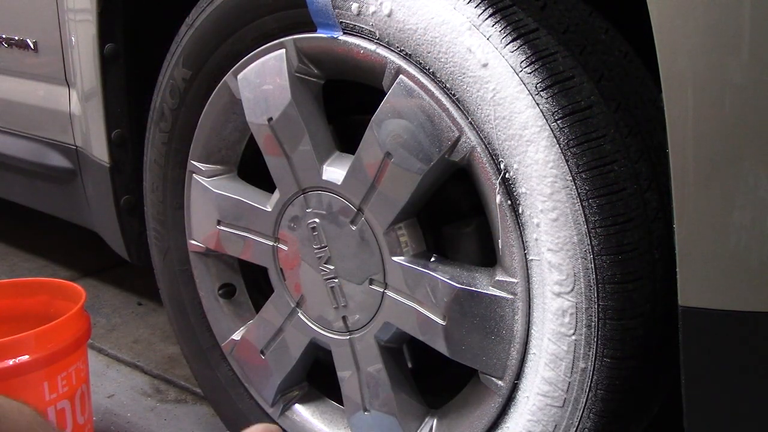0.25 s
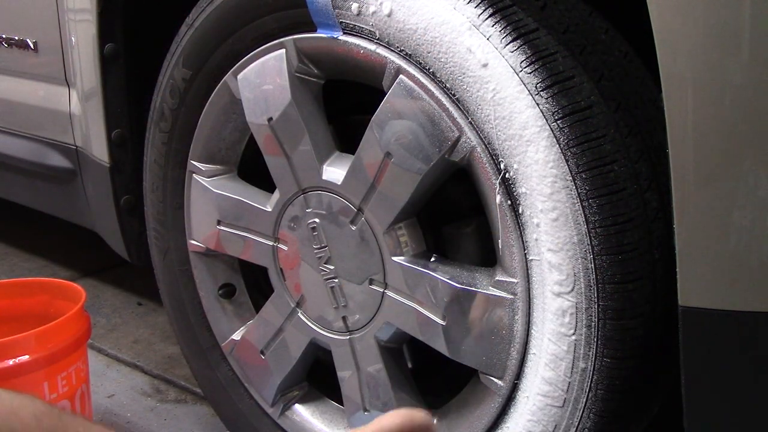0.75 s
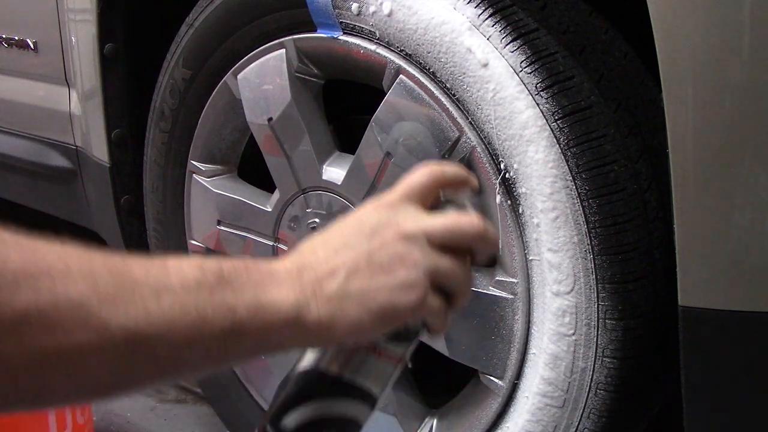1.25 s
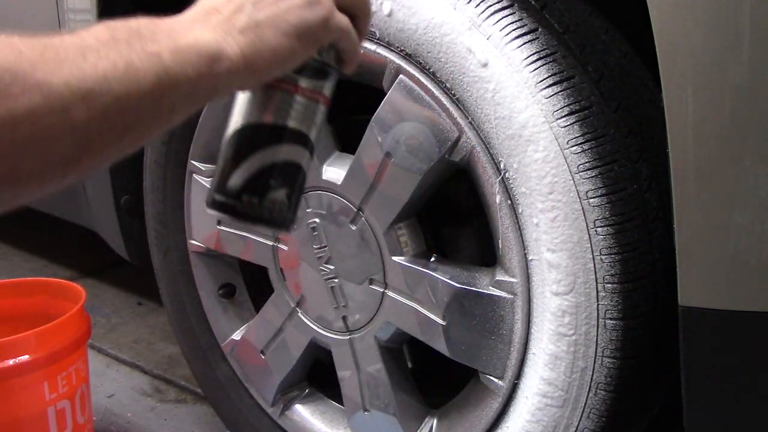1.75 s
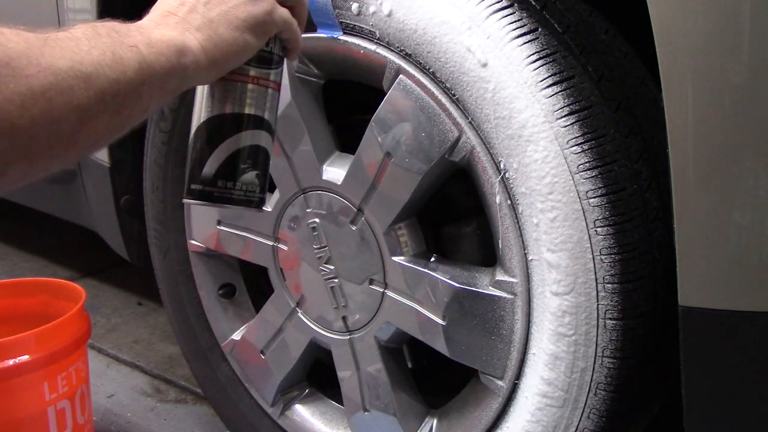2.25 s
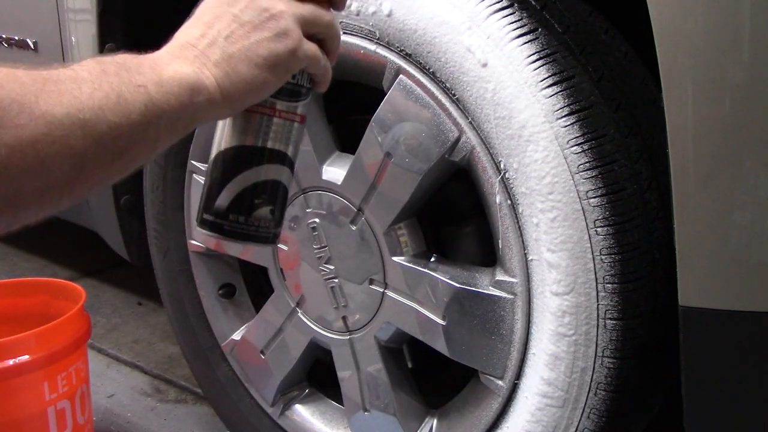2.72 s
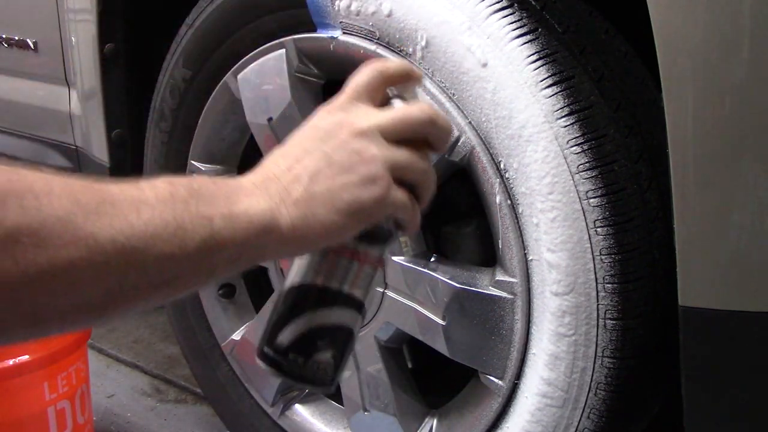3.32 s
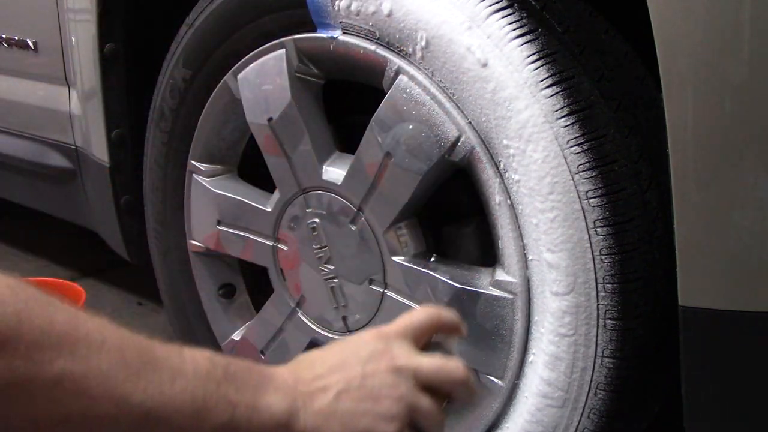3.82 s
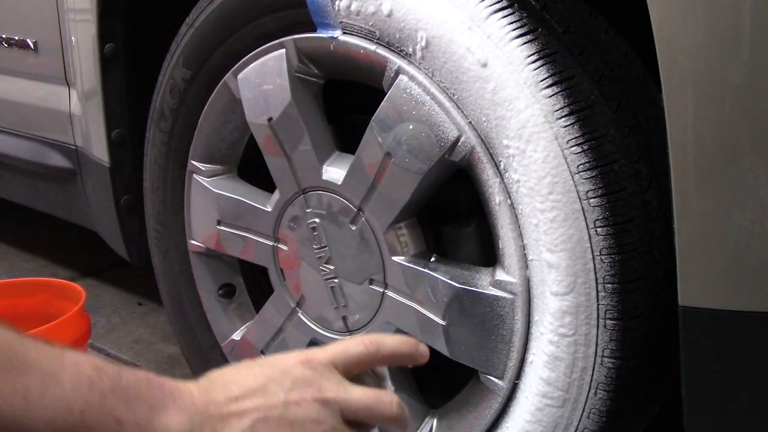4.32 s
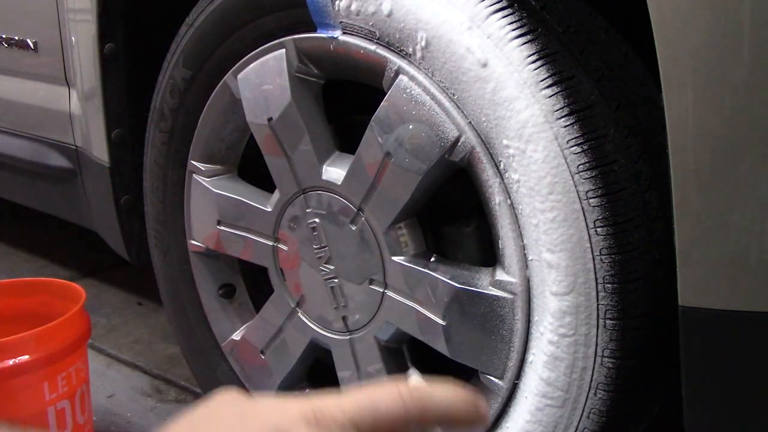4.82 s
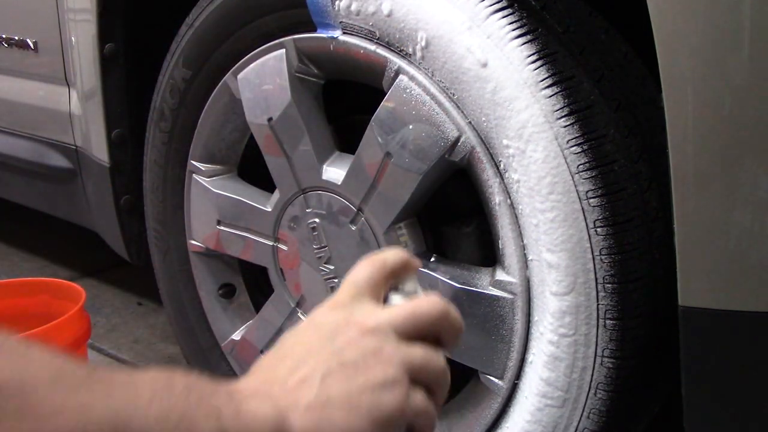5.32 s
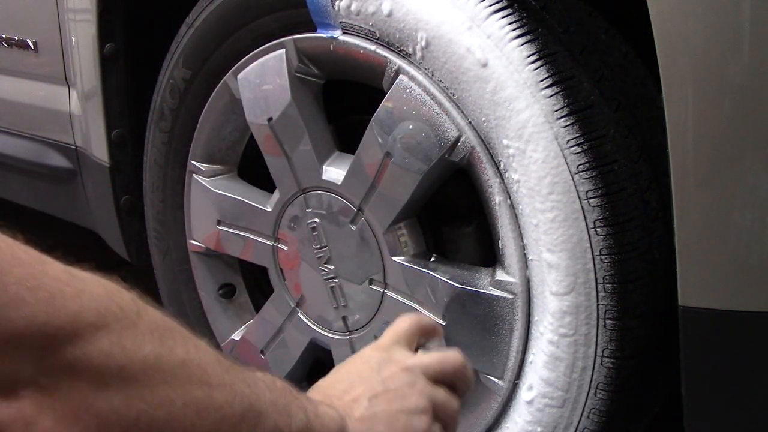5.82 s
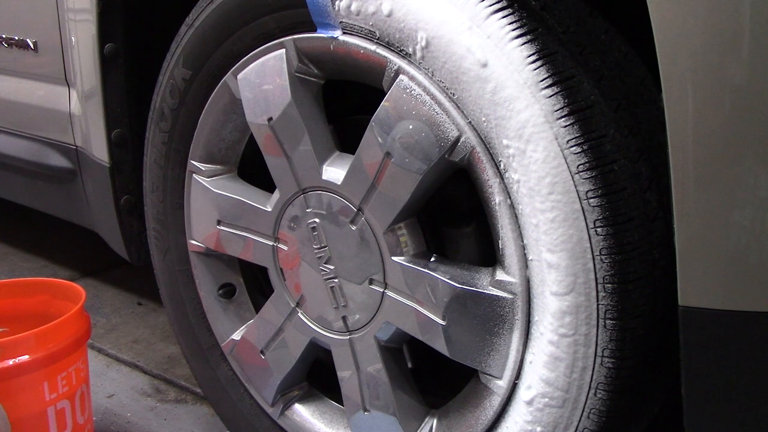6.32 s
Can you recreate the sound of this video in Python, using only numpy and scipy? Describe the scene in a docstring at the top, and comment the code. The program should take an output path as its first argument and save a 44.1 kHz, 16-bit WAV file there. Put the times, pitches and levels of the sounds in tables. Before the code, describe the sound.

Close by in a quiet garage, a spray can hisses steadily for about a second and a half, its rush sliding lower as the jet travels over a tire. It returns in four brief spurts, the first with a tiny whistle. Soft clacks of the handled can, cloth rustle and shuffling lead to a final short spurt, all over a faint low room hum.

```python
"""A bright hiss sweeps along, then returns in five short puffs: an aerosol can foams a tire in a garage.
Turbulence at the nozzle makes the steady hiss; the jet striking the rubber adds a band of rush, and the
gap between can and tire resonates, both moving with the aim. The first short puff breaks for an instant
into a cluster of whistling tones. A sleeve rustles, the can is knocked in the hand and rings in its
modes, and beneath it all lie a low room hum and a few faint chirps."""
import sys
import numpy as np
from scipy import signal
from scipy.fft import rfft, irfft
from scipy.io import wavfile

SR = 44100
rng = np.random.default_rng(int(sys.argv[2]) if len(sys.argv) > 2 else 0)


def digitize_waveform(pressure):
    """Quantize a signal to 16-bit integers and store it at the path in sys.argv[1].

    Rows of a 2-D input are taken as channels; values are limited to [-1, 1].
    """
    field = np.atleast_2d(pressure).T
    bounded = np.clip(field, -1, 1)
    quanta = np.round(bounded * 32767).astype(np.int16)
    wavfile.write(sys.argv[1], SR, quanta)


N = 289296
T = np.arange(N) / SR

# Spectrum of the nozzle hiss: frequency_hz, density_db
NOZZLE_SPECTRUM = [(100, -29), (400.0, -15), (1000.0, -9.5), (1500.0, -6), (2000.0, -5.5), (2600.0, -0.5),
                   (3400.0, -1.1), (4500.0, -0.9), (6000.0, -2), (7300.0, -6), (8100.0, -9.5),
                   (10000.0, -5.5), (12000.0, -11.5), (15000.0, -21.5)]
# Spectrum of the jet striking the rubber: frequency_hz, density_db
RUSH_SPECTRUM = [(1500.0, 1), (3000.0, -5), (4000.0, -9), (5700.0, -11.5), (6800.0, -18.5), (8000.0, -22),
                 (11000.0, -31), (15000.0, -53.1)]
# The long press of the valve: open_s, shut_s, rise_s
LONG_PRESS = (0.2993, 1.9034, 0.032)
# The aim as the can sweeps up the tire: time_s, hiss_db, rush_db, rush_edge_hz
SWEEP_AIM = [(.32, -29.7, -16, 7400), (.43, -30, -2.5, 7300), (.59, -31, -15, 5800), (.71, -30.5, -8, 5100),
             (.87, -30, -7.5, 4030), (1.02, -29, -9, 2940), (1.31, -28, -8, 3840),
             (1.49, -28.5, -10.5, 2940), (1.65, -27.5, -9.5, 3620), (1.77, -28, -13, 3570),
             (1.9, -30, -8.5, 3900)]
# Short puffs: open_s, shut_s, rise_s, hiss_db, sag_db_per_s, rush_db, swell_db_per_s, edge_hz, ring_db
PUFFS = [(2.403, 2.526, 0.038, -28, 14, -19, 114, 4950, -6),
         (2.952, 3.111, 0.033, -27.5, 5, -12, 17, 2900, 4.5),
         (3.369, 3.5376, 0.032, -25, 31, -11, 6, 2870, -.5),
         (3.727, 3.896, 0.022, -27, 33, -15, 2, 2270, 6.5),
         (5.776, 5.906, 0.048, -26, 55, -20.5, 14, 1900, -2.5)]
# Resonance of the gap between can and tire during the sweep: pitch_to_edge_ratio, lift_db
SWEEP_RESONANCE = (0.99, 5.4)
# A lower resonance of the same gap: pitch_to_edge_ratio, lift_db, width_ratio
LOW_RESONANCE = (0.332, 5.3, 0.11)
# Whistling tones within the first short puff: pitch_hz, level_db
WHISTLE_TONES = [(1707, -44.5), (2568, -44), (3219, -44), (4059, -39), (4479, -43), (5868, -36),
                 (6105, -46), (6923, -44), (7467, -33.5), (8640, -41), (9851, -44), (10304, -43)]
# Knocks of the can in the hand: start_s, thud_db, clack_db, tick_db, rebound_db
KNOCKS = [(.359, -29.5, -36, -60, -11), (4.072, -51, -54.5, -58, -18), (4.103, -63, -58, -48.5, -20),
          (4.149, -53, -57, -46, -20), (4.397, -49, -40.5, -55, -11), (4.585, -46, -49.5, -60, -10),
          (5.169, -47, -42, -43, -1), (5.375, -36.5, -43, -49, -16), (5.647, -57, -46.5, -41.5, -18),
          (5.715, -43, -33.5, -37, -8.5), (6.261, -56, -54, -48, -20)]
# Modes of the hand-held can: pitch_hz, level_db, t60_s
CAN_MODES = [(152.5, 0, 0.15), (248, -14, 0.079), (473, -0.5, 0.088), (597, -3.5, 0.084), (991, 3.5, 0.04),
             (1395, -12, .07), (2060, -4, 0.054), (2630, -2.5, .05), (3670, -6, .04), (4550, -2, 0.028),
             (6300, -21, .03)]
# Strokes of the sleeve as the arm moves: peak_s, swell_s, fade_s, level_db
SLEEVE_STROKES = [(.2, .25, 0.33, -64), (4.41, 0.24, 0.053, -52), (4.6, 0.16, 0.2, -54),
                  (5.03, 0.44, 0.12, -58), (5.44, 0.4, 0.14, -61), (6.21, 0.55, 0.12, -60)]
# Spectrum of sliding cloth: frequency_hz, density_db
CLOTH_SPECTRUM = [(410, -48), (700, -9.5), (1200, -7.5), (1310, -11.5), (1490, -5), (2560, -7), (5240, -2),
                  (9580, -14.5), (15000, -26)]
# Shuffles of a body shifting its weight: peak_s, swell_s, fade_s, level_db
SHUFFLES = [(4.5, .6, 0.39, -63.5), (5.37, 0.3, 0.18, -55), (5.69, 0.17, 0.2, -55)]
# Spectrum of a dull shuffle: frequency_hz, density_db
SHUFFLE_SPECTRUM = [(80, -31), (170, -2), (280, -2), (600, -8.5), (800, -18), (2000, -19.5), (6000, -52)]
# Reverberation of the garage: frequency_hz, t60_s, level_db
GARAGE_DECAY = [(150, .3, 0.5), (496, 0.32, 0.5), (1490, 0.38, -4), (3020, 0.35, -3.5), (5200, 0.39, -1),
                (8998, 0.27, -0.5), (15000, 0.2, -0.5)]
# Spectrum of the room's rumble: frequency_hz, density_db
ROOM_SPECTRUM = [(12, -40), (20, -6.5), (119, -8.5), (148, -14), (191, -15.5), (315, -21.5), (393, -27),
                 (427, -24), (788, -28), (1160, -32.5), (1340, -32), (1820, -35), (3170, -34),
                 (3640, -35.5), (15500, -47)]
# Tones of the mains hum: pitch_hz, level_db
HUM_TONES = [(57, -68.5), (119.9, -60.5), (408, -80.5)]
# Faint thin chirps: middle_s, half_length_s, pitch_hz, level_db
CHIRPS = [(2.257, 0.029, 3010, -61.5), (2.31, 0.025, 2580, -65), (2.85, 0.033, 3090, -74),
          (4.27, .09, 1620, -67)]


def spray(nozzle_db=-0.5, impact_db=-0.83, ripple_db=0.27, sputter_db=0.75):
    """Turbulence radiates broadband noise at the nozzle and on the rubber; the two add in power."""
    hz, t, spectra = signal.stft(rng.standard_normal(N), SR, nperseg=512, noverlap=384)
    hz = hz[:, None]
    hiss_db, rush_db, edge_hz, ring_hz, lift_db = aim(t)
    over_edge = (hz + 1) / edge_hz
    # the rush swells a little at its lower edge and falls steeply below it
    high_pass = amp(1.5 * bell(over_edge, 0.091)) / np.sqrt(1 + (1.192 / over_edge) ** 8)
    nozzle = amp(nozzle_db + hiss_db + read(NOZZLE_SPECTRUM, hz))
    rush = high_pass * amp(impact_db + rush_db + read(RUSH_SPECTRUM, hz))
    # the reflection off the wheel combs the hiss, and the comb slides with the aim
    comb = amp(ripple_db * np.cos(4 * np.pi * over_edge))
    gain = np.hypot(nozzle, rush) * gap_resonance(hz, over_edge, ring_hz, lift_db) * comb
    hiss = signal.istft(spectra * gain, SR, nperseg=512, noverlap=384)[1][:N]
    return hiss * valve() * amp(sputter_db * wander(T, 45))


def valve(drain_s=0.0091):
    """The valve throttles the flow (0 to 1): it opens gently; once shut, the nozzle drains away."""
    flow = np.zeros(N)
    for opens, shuts, rise, *_ in [LONG_PRESS, *PUFFS]:
        opening = np.clip((T - opens) / rise, 0, 1) ** 1.46
        flow += np.sin(np.pi / 2 * opening) * np.exp(-np.maximum(T - shuts, 0) / drain_s)
    return flow


def aim(t, glide_oct_per_s=-0.6, ring_ratio=1.16):
    """The jet's aim sets its spectrum: hiss_db, rush_db, edge_hz, ring_hz, lift_db at the times t."""
    times, *columns = np.transpose(SWEEP_AIM)
    hiss_db, rush_db, edge_hz = (np.interp(t, times, column) for column in columns)
    sweep_ratio, lift_db = SWEEP_RESONANCE
    state = np.broadcast_arrays(hiss_db, rush_db, edge_hz, sweep_ratio * edge_hz, lift_db)
    for opens, shuts, rise, hiss_db, sag, rush_db, swell, start_hz, lift_db in PUFFS:
        held_s = np.clip(t, opens, shuts) - opens
        edge_hz = start_hz * 2 ** (glide_oct_per_s * held_s)
        puff = hiss_db - sag * held_s, rush_db + swell * held_s, edge_hz, ring_ratio * edge_hz, lift_db
        state = np.where(t > opens - rise, np.broadcast_arrays(*puff), state)
    return state


def gap_resonance(hz, over_edge, ring_hz, lift_db, strongest_hz=2520, range_oct=0.9):
    """The air between can and tire resonates, lifting two bands that glide together as the can moves."""
    low_ratio, low_db, low_width = LOW_RESONANCE
    peaks_db = lift_db * bell(hz / ring_hz, 0.068) + low_db * bell(over_edge / low_ratio, low_width)
    strength = np.exp(-(np.log2((hz + 1) / strongest_hz) / range_oct) ** 2)
    return amp(peaks_db * strength)


def whistle(hiss, middle_s=2.478, half_length_s=0.016, tones_db=-3, dip=0.78):
    """Broadband noise gives way for a moment to a line spectrum of wavering tones."""
    share = np.exp(-((T - middle_s) / half_length_s) ** 4)
    tones = wavering_tones(WHISTLE_TONES, waver_rad=0.9, rate_hz=200)
    return hiss * (1 - dip * share) + amp(tones_db) * share * tones


def can_knocks(thud_hz=330, tick_hz=1800, scuff_db=-4, ring_db=-8, detune=0.085):
    """Impacts excite damped modes: soft blows ring the low ones, hard blows the high."""
    out, t = np.zeros(N), np.arange(SR // 3) / SR
    edges_hz = (120, thud_hz), (thud_hz, tick_hz), (tick_hz, 5500)
    bands = [signal.butter(3, edges, "band", fs=SR, output="sos") for edges in edges_hz]
    # each blow starts with a scuff that trails off as the fingers slide
    scuff_decay = np.exp(-t / 0.004) + amp(-15) * np.exp(-t / 0.028)
    for start_s, *levels in blows():
        scuff = sum(amp(db + scuff_db) * band_noise(band, len(t)) for db, band in zip(levels, bands))
        blow = scuff * scuff_decay
        for hz, mode_db, t60 in CAN_MODES:
            band_db = levels[int(hz > thud_hz) + int(hz > tick_hz)]
            pitch_hz = hz * (1 + detune * rng.uniform(-1.12, 1))
            ring = np.sin(2 * np.pi * (pitch_hz * t + rng.random()))
            blow += amp(ring_db + band_db + mode_db) * ring * np.exp(-np.log(1000) * t / t60)
        add(out, start_s, blow * (1 - np.exp(-t / 0.001)))
    return out


def blows(rebound_s=0.022, dulling_db=(2, 0.5, -3)):
    """The can rebounds after each knock with a duller blow: start_s, thud_db, clack_db, tick_db."""
    for start_s, *levels, rebound_db in KNOCKS:
        yield start_s, *levels
        yield start_s + rebound_s, *(np.add(levels, dulling_db) + rebound_db)


def button_tick(start_s=4.0625, level_db=-53, decay_s=0.0029):
    """A finger leaving the button makes a transient: a tiny burst of high, fast-decaying noise."""
    out, t = np.zeros(N), np.arange(2000) / SR
    band = signal.butter(2, (10000, 12800), "band", fs=SR, output="sos")
    add(out, start_s, amp(level_db) * band_noise(band, len(t)) * np.exp(-t / decay_s))
    return out


def rustle(cloth_db=-1.5, shuffle_db=1.5, grain_db=1.5, lumps_db=2):
    """Friction makes noise: cloth slides in fine catches, and the shifting body adds a lumpy shuffle."""
    catches = rng.standard_normal(N) * amp(grain_db * wander(T, 500))
    cloth = colour(catches, CLOTH_SPECTRUM) * amp(cloth_db)
    shuffle = noise(SHUFFLE_SPECTRUM) * amp(shuffle_db + lumps_db * wander(T, 35))
    return cloth * strokes(SLEEVE_STROKES) + shuffle * strokes(SHUFFLES)


def strokes(rows, drop_db=14, roundness=1.21):
    """Incoherent sounds add in power: the joint envelope of movements that each swell and fade."""
    power = 0
    for peak_s, swell_s, fade_s, db in rows:
        from_peak = np.maximum((peak_s - T) / swell_s, (T - peak_s) / fade_s)
        power += amp(db - drop_db * from_peak ** roundness) ** 2
    return np.sqrt(power)


def garage(x, gap_s=0.0028, sway_per_s=2.5, patterns=4):
    """Reverberation: dense reflections die at each band's own rate, and shift as the arm moves."""
    wet, room = np.zeros(N), np.array(GARAGE_DECAY)
    for k in range(patterns):
        hz, t, spectra = signal.stft(rng.standard_normal(SR), SR, nperseg=256)
        t60, level_db = read(room[:, :2], hz[:, None]), read(room[:, ::2], hz[:, None])
        tail = signal.istft(spectra * amp(level_db) * np.exp(-np.log(1000) * t / t60), SR)[1]
        tail *= np.clip(np.arange(len(tail)) / SR / gap_s - 1, 0, 1)
        share = np.sqrt(2 / patterns) * np.cos(np.pi * (sway_per_s * T + k / patterns))
        wet += signal.fftconvolve(x * share, tail / np.linalg.norm(tail))[:N]
    return wet


def room_tone(rumble_db=-56.5):
    """The noise floor: a continuous low rumble under the spectral lines of a mains hum."""
    hum = wavering_tones(HUM_TONES, waver_rad=0.24, rate_hz=3.7)
    return amp(rumble_db) * noise(ROOM_SPECTRUM) + hum


def chirps(waver_rad=0.91, rate_hz=110):
    """Faint phase-modulated tones swell and fade under Gaussian envelopes."""
    out = np.zeros(N)
    for middle_s, half_length_s, hz, db in CHIRPS:
        envelope = amp(db) * np.exp(-((T - middle_s) / half_length_s) ** 2)
        out += envelope * np.sin(2 * np.pi * hz * T + waver_rad * wander(T, rate_hz))
    return out


def wavering_tones(rows, waver_rad, rate_hz):
    """Random phase modulation broadens each tone's spectral line."""
    out = np.zeros(N)
    for hz, db in rows:
        phase = 2 * np.pi * (hz * T + rng.random()) + waver_rad * wander(T, rate_hz)
        out += amp(db) * np.sqrt(2) * np.sin(phase)
    return out


def bell(ratio, width):
    """A resonance curve: 1 where the ratio to its pitch is 1."""
    return 1 / (1 + ((ratio - 1) / width) ** 2)


def wander(t, rate_hz):
    """Random drift: straight lines between Gaussian values."""
    return np.interp(t * rate_hz, np.arange(4096), rng.standard_normal(4096))


def band_noise(band, length):
    """Band-limited noise at rms 1."""
    return unit_rms(signal.sosfilt(band, rng.standard_normal(length)))


def noise(spectrum):
    """Stationary coloured noise at rms 1."""
    return colour(rng.standard_normal(N), spectrum)


def colour(x, spectrum):
    """Filtering multiplies spectra; the result has rms 1."""
    return unit_rms(irfft(rfft(x) * amp(read(spectrum, np.fft.rfftfreq(N, 1 / SR))), N))


def read(points, hz):
    """Interpolation on a log-frequency axis."""
    point_hz, values = np.transpose(points)
    return np.interp(np.log(hz + 1), np.log(point_hz + 1), values)


def unit_rms(x):
    """Normalisation to rms 1."""
    return x / np.sqrt(np.mean(x ** 2) + 1e-20)


def amp(db):
    """Decibels to amplitude ratio."""
    return 10 ** (np.asarray(db) / 20)


def add(mix, start_s, sound):
    """Superposition of a sound on the mix from start_s."""
    part = mix[max(round(start_s * SR), 0):][:len(sound)]
    part += sound[:len(part)]


def scene(hiss_wet_db=-10, knock_wet_db=-6):
    """Direct and reflected sound superpose in mono; knocks stir the room more than the aimed jet."""
    hiss = spray() + rustle()
    hits = can_knocks() + button_tick()
    reflections = garage(amp(hiss_wet_db) * hiss + amp(knock_wet_db) * hits)
    mono = whistle(hiss + hits + reflections) + room_tone() + chirps()
    return np.array([mono, mono])


def record(dry, cutoff_hz=15780):
    """A steep low-pass filter limits the bandwidth."""
    low_pass = signal.firwin(1023, cutoff_hz, window=("kaiser", 9), fs=SR)
    return signal.oaconvolve(dry, low_pass[None], "same", axes=1)


dry = scene()
out = record(dry)
digitize_waveform(out)
```